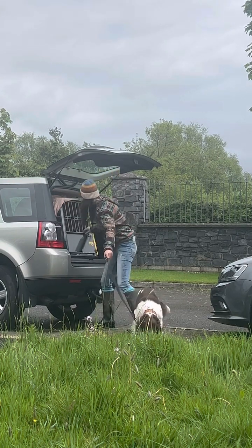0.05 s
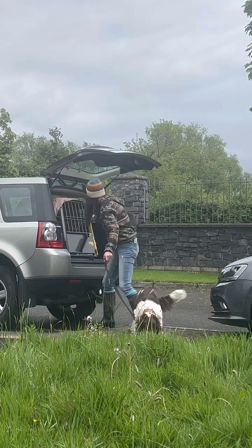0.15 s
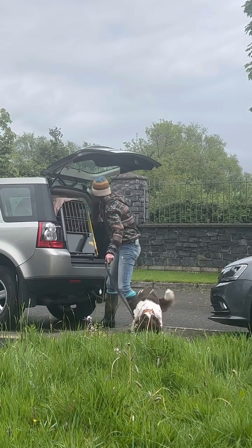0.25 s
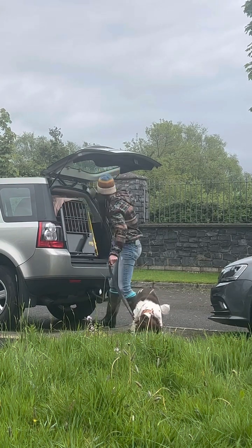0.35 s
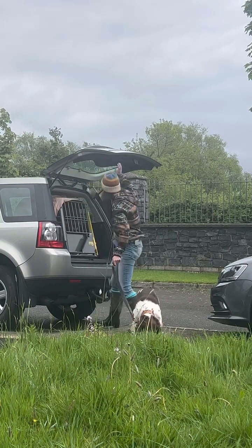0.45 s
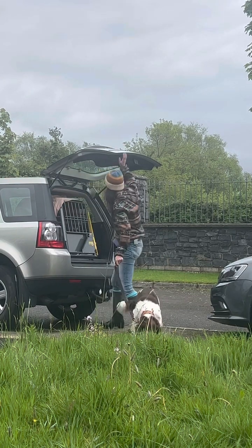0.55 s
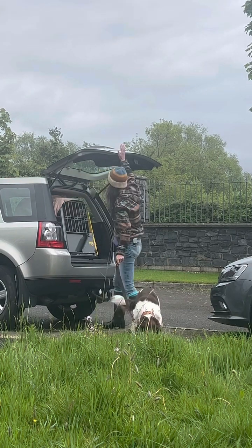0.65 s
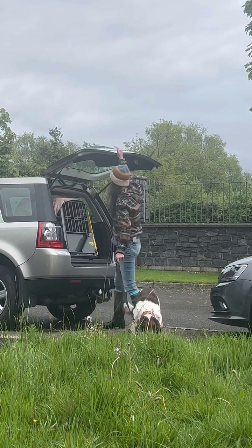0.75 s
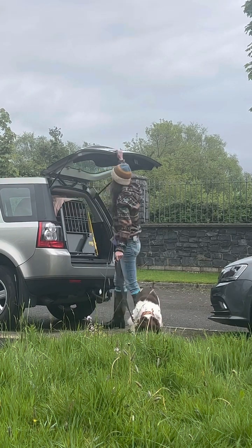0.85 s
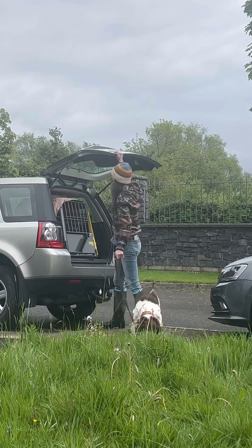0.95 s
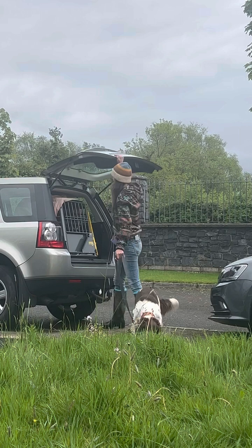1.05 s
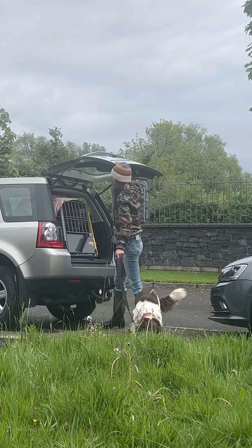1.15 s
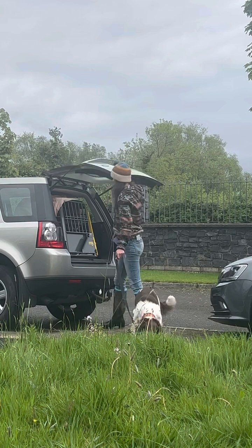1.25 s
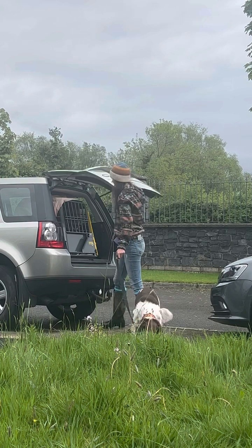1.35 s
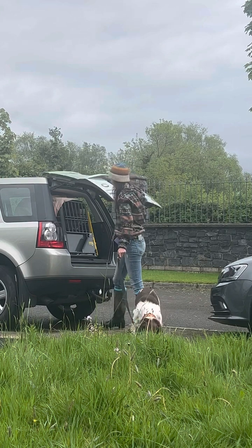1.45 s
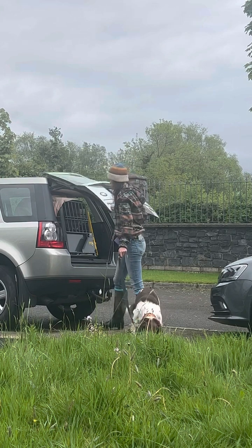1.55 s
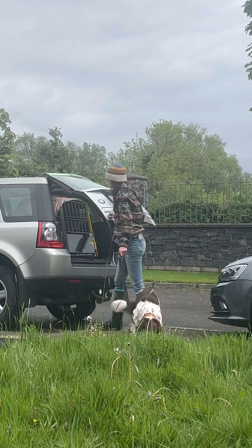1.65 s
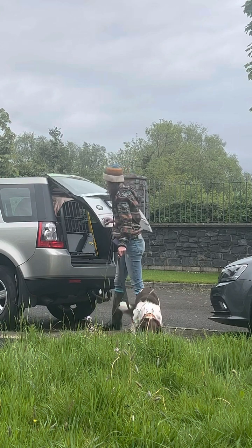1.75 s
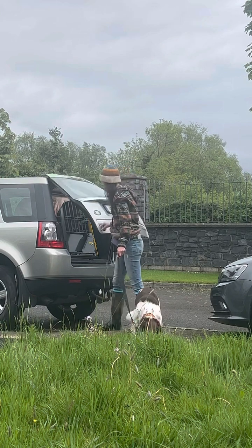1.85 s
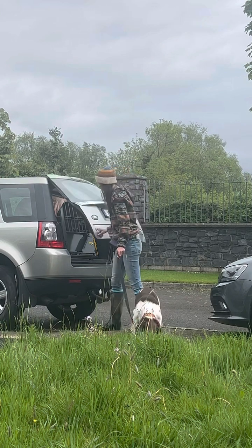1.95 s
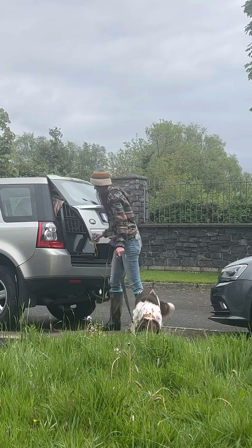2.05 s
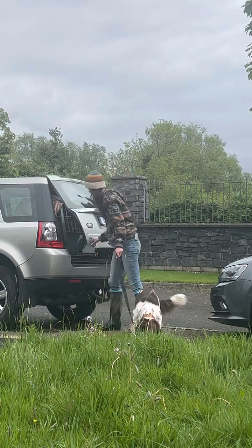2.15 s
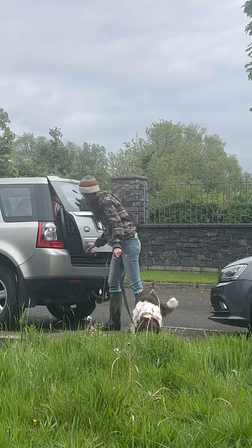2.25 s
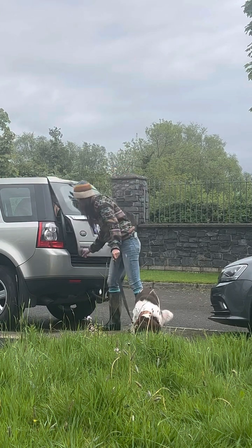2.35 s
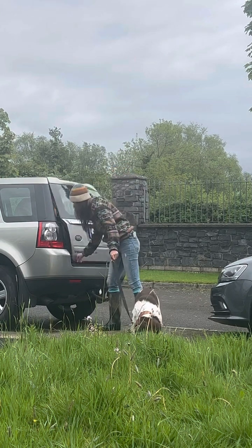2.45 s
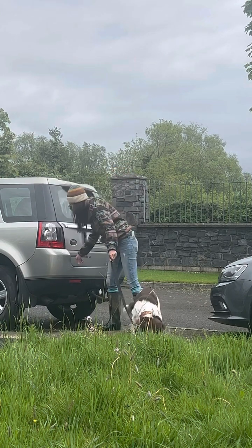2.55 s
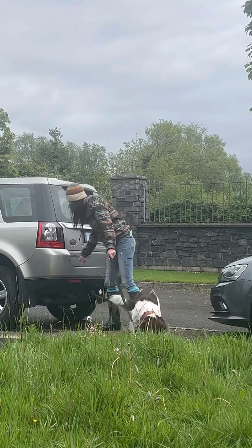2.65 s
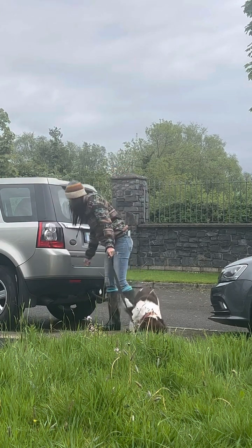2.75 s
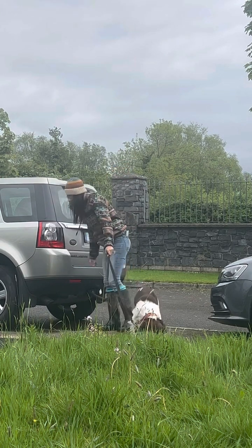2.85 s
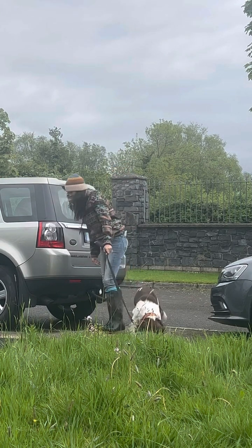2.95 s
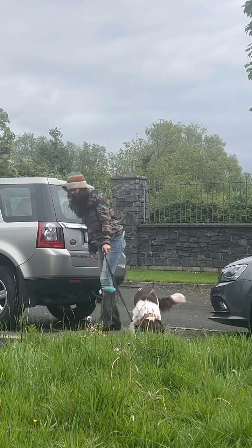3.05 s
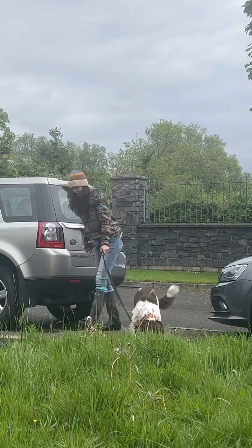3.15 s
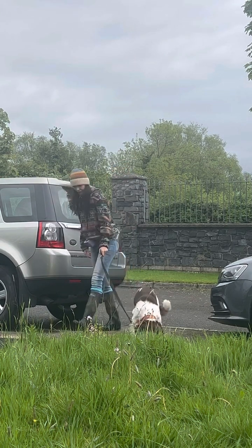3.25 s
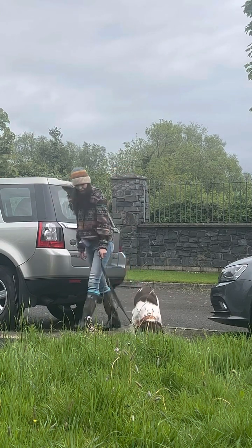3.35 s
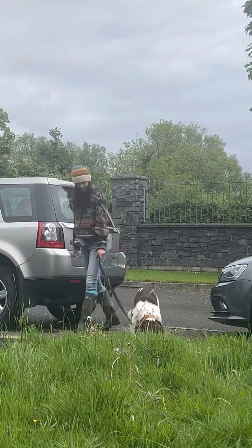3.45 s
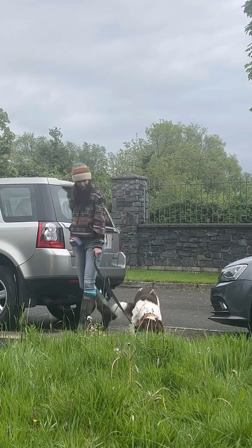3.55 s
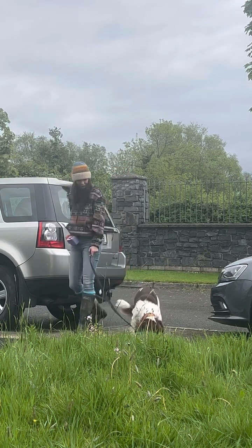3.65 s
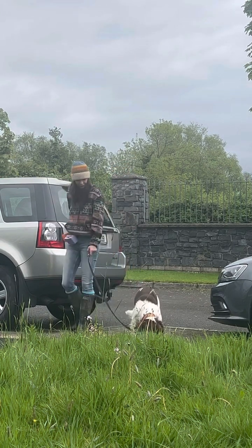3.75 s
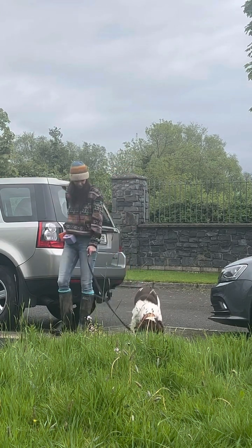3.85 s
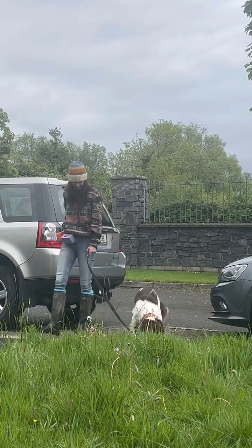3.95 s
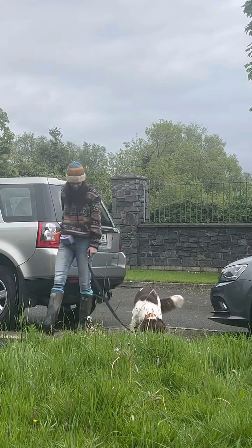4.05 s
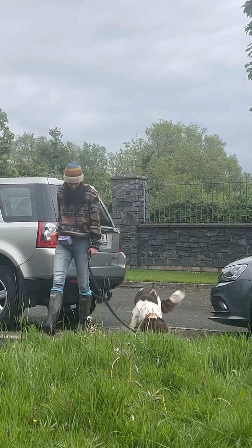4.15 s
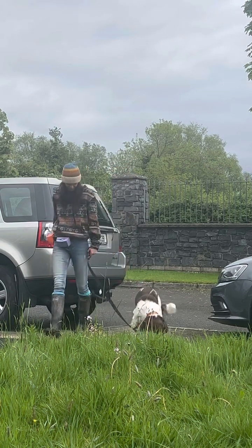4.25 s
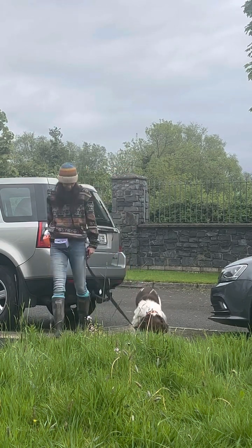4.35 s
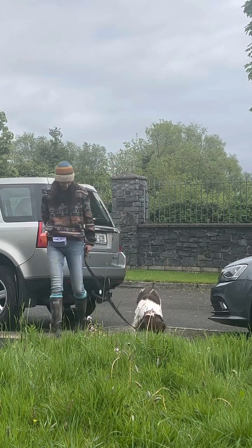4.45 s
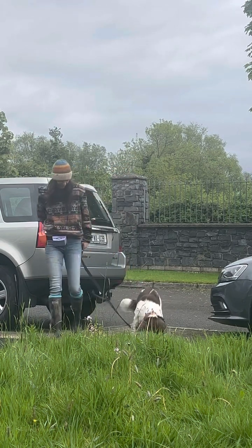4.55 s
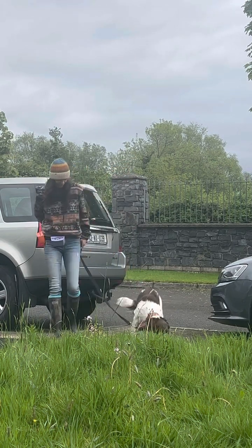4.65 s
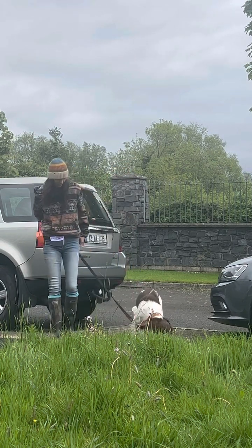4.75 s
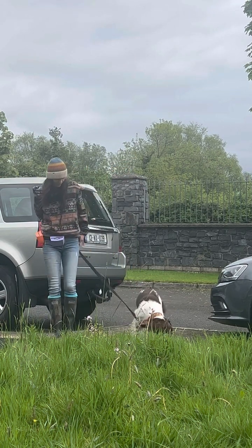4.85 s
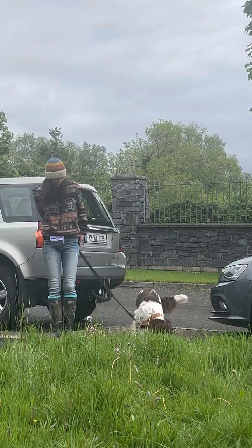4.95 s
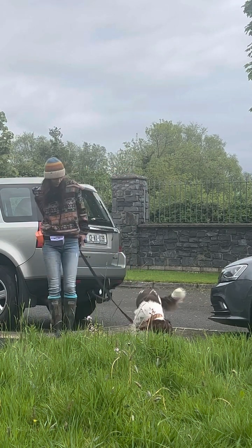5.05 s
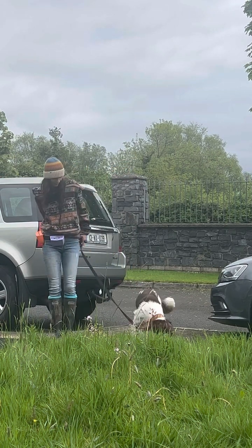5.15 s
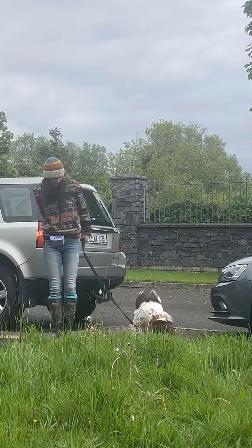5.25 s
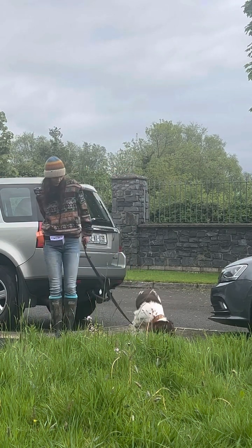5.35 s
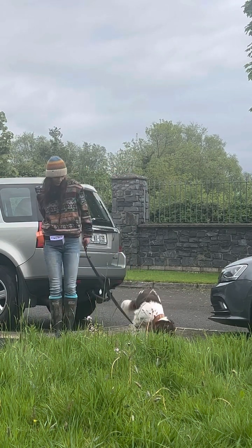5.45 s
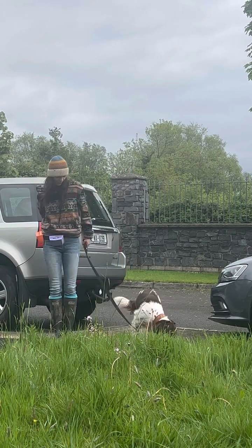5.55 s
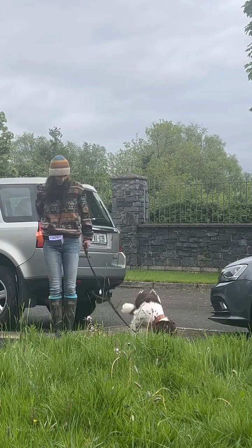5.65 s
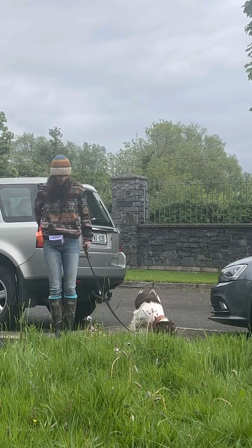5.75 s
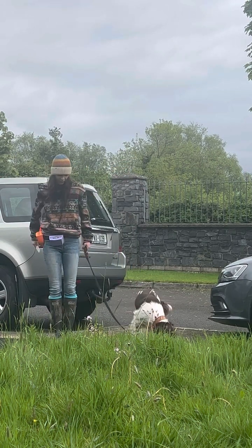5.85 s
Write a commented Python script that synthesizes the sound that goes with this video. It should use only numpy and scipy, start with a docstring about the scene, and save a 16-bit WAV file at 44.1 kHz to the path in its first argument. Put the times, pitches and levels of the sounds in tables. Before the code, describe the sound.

A quiet country roadside is heard from several metres away. Distant traffic hums low throughout, and small birds give faint chirps, thin whistles and buzzy trills in the trees, a little to the right, clearest around 0.5 seconds and from 2.4 to 3.2 seconds. In the first two seconds, rubber boots make a few soft thuds and scuffs, with a barely audible hiss from the tailgate's struts. At 2.5 seconds the car tailgate gives a short falling squeak and immediately slams shut, slightly left. This is by far the loudest sound: a deep boom with a latch clack and a shudder of panels, dying away within about half a second. More soft steps come at 3.5 seconds and around 4.3 to 4.4 seconds. A very faint crow caws once near 4.2 seconds, and a faint hollow tone swells far off. Birds and traffic continue until about 6 seconds.

```python
"""A tailgate shut at a country roadside

Some metres away across a grass verge, a car's tailgate comes down on faintly hissing gas struts.
It squeaks by stick-slip friction, the latch catches, and the impact excites the body's modes,
so that it booms and shudders. Boots shuffle, small birds sing frequency-modulated notes in the
trees, and far off a crow calls once and a hollow tone swells, over the hum of distant traffic."""
import sys
import numpy as np
from scipy import signal
from scipy.fft import rfft, irfft
from scipy.io import wavfile
from scipy.ndimage import uniform_filter1d

SR = 44100
rng = np.random.default_rng(int(sys.argv[2]) if len(sys.argv) > 2 else 0)


def master_out(mix):
    """Clip the mix to full scale and print it as 16-bit PCM to the path in sys.argv[1]."""
    frames = np.transpose(np.atleast_2d(mix))
    ceiling = np.clip(frames, -1, 1)
    pcm = np.round(ceiling * 32767).astype(np.int16)
    wavfile.write(sys.argv[1], SR, pcm)


N = 260190
TIME = np.arange(N) / SR
HZ = np.fft.rfftfreq(N, 1 / SR)


# Blows of the gate on its seal. Each row: start in seconds, push in dB, contact time in seconds.
SEAL_BLOWS = [(2.5417, -37.5, 0.0026), (2.5812, -9.5, 0.0019), (2.592, -32, 0.00047), (2.6165, -23, .0007),
              (2.6485, -22, 0.0023), (2.6685, -17, 0.0019), (2.792, -30.5, 0.0041)]
# Modes of panels and cabin. Each row: frequency in Hz, level in dB, 60 dB decay time (T60) in seconds.
BODY_MODES = [(41, -10.5, 0.45), (62.3, -2, 0.15), (75.15, -4.5, 0.59), (103, -13.5, 0.31),
              (119.8, -11.5, 0.5), (139.2, -11.5, 0.29), (175.3, 1.9, 0.15), (196.5, -2, 0.12),
              (234, -7.5, 0.17), (278, -3.5, 0.064), (329.2, 0, 0.3), (468, -2, 0.12), (509, -3, 0.17),
              (634, -4, .09), (730, -13, 0.17), (785, -33, 0.049), (944, -7.5, 0.11), (1077, -9.5, 0.086),
              (1133, -9.5, .15), (1260, -5, 0.073)]
# Small panels, too many to tell apart. Each row: frequency in Hz, T60 in seconds.
PANEL_DECAY = [(100, .31), (350, 0.42), (1000, 0.13)]
# Shudder of loose trim and load. Each row: frequency in Hz, relative spectral level in dB.
SHUDDER_SPECTRUM = [(30, -30), (60, -10), (125, -5), (320, -1), (410, -6), (600, -8), (900, -0.5),
                    (1500, -18), (4000, -42.5)]

def body_boom(shudder_db=16):
    """Modal response: each blow rings the body's damped modes; dense panel modes merge into a rumble."""
    t = np.arange(SR) / SR
    ring = -sum((-1) ** k * gain_of(db - 60 * t / t60) * np.sin(2 * np.pi * hz * t)
                for k, (hz, db, t60) in enumerate(BODY_MODES))
    force = np.zeros(N)
    for start, push_db, contact in SEAL_BLOWS:
        u = 2 * t / contact  # a longer contact, on the rubber seal, reaches only the low modes
        pulse = u * np.exp(-u)
        add(force, start, gain_of(push_db) * pulse / pulse.sum())
    boom = lowpass(signal.fftconvolve(force, ring)[:N], 3000, order=4)
    panels = echoes(force, PANEL_DECAY, rise_s=0.013)[0]
    shudder = filtered(panels, unit_rms(gain_of(curve_at(SHUDDER_SPECTRUM))))
    return boom + gain_of(shudder_db) * shudder


# Clacks of latch and trim. Each row: start in seconds, level in dB, cutoff in Hz, T60 in seconds.
LATCH_CLACKS = [(2.5745, -32, 3700, 0.09), (2.5835, -30.5, 13000, 0.068), (2.597, -39, 7000, 0.1),
                (2.62, -48, 9000, 0.29), (2.642, -50, 9000, 0.19), (2.665, -46, 8600, 0.076),
                (2.676, -45, 3400, 0.059)]
# Their shared timbre. Each row: frequency in Hz, relative spectral level in dB.
LATCH_SPECTRUM = [(200, -24), (500, 7.5), (900, 3), (1400, -7.5), (2400, -5.5), (3300, -4.5), (4500, -11),
                  (5500, -17), (7200, -13), (11000, -25.5), (12800, -38), (16000, -35.5)]

def latch(rattle_db=-20, rattle_t60=0.11, grain_db=3, rise_s=0.002):
    """Impact noise: each clack is a gritty burst that decays exponentially, with a faint rattle."""
    t = np.arange(SR // 4) / SR
    clacks, hiss = np.zeros((2, N)), noise(0)
    for k, (start, db, cutoff_hz, t60) in enumerate(LATCH_CLACKS):
        attack = 1 - np.exp(-t / rise_s)
        decay = gain_of(-60 * t / t60) + gain_of(rattle_db - 60 * t / rattle_t60)
        grain = unit_rms(gain_of(grain_db * np.tanh(wander(len(t), span=50))))
        burst = gain_of(db) * attack * decay * grain * hiss[:, k * len(t):(k + 1) * len(t)]
        add(clacks, start, lowpass(burst, cutoff_hz, order=2))
    return filtered(clacks, unit_rms(gain_of(curve_at(LATCH_SPECTRUM))))


# The two slips of the closing gate. Each row: start in seconds, length in seconds, level in dB.
SQUEAK_SLIPS = [(2.482, 0.026, -39), (2.502, 0.0732, -35.5)]

def squeak(start_hz=594, sag=0.09, brake=0.085, jitter=0.0032):
    """Stick-slip friction: a falling tone whose second harmonic grows as the upper ones fade."""
    start, end = SQUEAK_SLIPS[0][0], SQUEAK_SLIPS[-1][0] + SQUEAK_SLIPS[-1][1]
    u = np.linspace(0, 1, int((end - start) * SR))
    hz = start_hz * (1 - sag * u - brake * u ** 6)  # sags, then drops as the seal brakes the gate
    phase = phase_of(hz * (1 + jitter * wander(len(u), span=150)))
    flicker_db = 4.8 * wander((4, len(u)), span=600)  # uneven slips: upper harmonics come and go
    upper = sum(gain_of(flicker_db[i] - 1.2 * i) * np.sin(k * phase) for i, k in enumerate(range(3, 7)))
    second = gain_of(-24.5 + 25.5 * u) * np.sin(2 * phase)
    tone, swell = np.zeros((2, N))
    add(tone, start, np.sin(phase) + second + gain_of(-23 - 7.5 * u) * upper)
    for onset, length, db in SQUEAK_SLIPS:
        skewed = np.linspace(0, 1, int(length * SR)) ** 1.36  # swells more slowly than it dies
        add(swell, onset, gain_of(db) * abs(np.sin(np.pi * skewed)) ** 0.63)
    return np.sqrt(2) * swell * tone


# Direction of the car. Each row: frequency in Hz, left minus right level in dB.
CAR_BALANCE = [(120, 0), (350, 2), (550, 5.5), (1200, 6.5), (3500, 0)]
# Reverberation of the street. Each row: frequency in Hz, T60 in seconds.
STREET_DECAY = [(60, 0.36), (250, 0.87), (1000, 0.47), (4000, 0.13), (12000, 0.42)]

def tailgate(street_db=-20, wall_db=-23, wall_delay_s=0.072):
    """Reflection: the slam comes from the left; a stone wall behind the car and the street return it."""
    direct = body_boom() + latch() + squeak()
    sides = gain_of(np.array([[.5], [-.5]]) * curve_at(CAR_BALANCE))
    wall = gain_of(wall_db) * np.exp(-2j * np.pi * HZ * wall_delay_s)
    street = gain_of(street_db) * echoes(direct[0], STREET_DECAY, rise_s=0.023)
    return filtered(direct, sides + wall) + street


# Pulls on the gas struts. Each row: start in seconds, length in seconds, level in dB.
STRUT_PULLS = [(0.953, 0.28, -91), (1.148, 0.34, -85), (1.38, 0.31, -86.5), (1.7, 0.98, -94)]
# Hiss of the gas. Each row: frequency in Hz, relative spectral level in dB.
STRUT_SPECTRUM = [(2000, -30), (6000, -5), (9600, -3), (12000, -4), (13500, -19), (16000, -32)]

def struts():
    """Flow noise: gas hisses softly through the struts while the gate comes down."""
    return swells(STRUT_PULLS) * noise(curve_at(STRUT_SPECTRUM))


# Steps on the road. Each row: start in seconds, level in dB, nominal pitch in Hz.
BOOT_STEPS = [(0.063, -43.5, 158), (0.519, -45.5, 207), (.886, -48, 190), (1.685, -44, 229),
              (3.483, -40, 187), (4.298, -49.5, 240), (4.311, -39, 105), (4.401, -40.5, 187)]
# Scuffs of boots and coat. Each row: start in seconds, length in seconds, level in dB.
SCUFF_STROKES = [(0.446, 0.21, -57), (1.569, 0.23, -53), (1.75, 0.15, -62), (4.196, 0.35, -60)]
# Timbre of the scuffs. Each row: frequency in Hz, relative spectral level in dB.
SCUFF_SPECTRUM = [(90, -19.5), (200, 4), (330, -13), (600, -9.5), (1200, -28), (8000, -54)]

def boots(thud_s=0.007, sag=0.68):
    """Damped impact and friction: rubber soles thud, sinking in pitch as they settle, and scuff."""
    u = np.arange(SR // 8) / SR / thud_s
    thuds = np.zeros(N)
    for start, db, hz in BOOT_STEPS:
        pitch = hz * (1 + sag * (np.exp(-u) - .3))
        add(thuds, start, gain_of(db) * u * np.exp(1 - u) * np.sin(phase_of(pitch)))
    street = gain_of(-14) * echoes(thuds, STREET_DECAY, rise_s=0.0096)
    return thuds + street + swells(SCUFF_STROKES) * noise(curve_at(SCUFF_SPECTRUM))


FLICKS_PER_S = 77

def trill(length, hz, fall_oct=.25, swing_hz=850, narrowing=0.382, swell_db=6):
    """Frequency and amplitude modulation: pitch and loudness of a falling buzz of uneven flicks."""
    fall = glide(length, hz, -fall_oct)
    u = np.linspace(0, 1, len(fall))
    hurry, height = wander((2, len(u)), span=500)
    flick = 1 - abs(np.cos(phase_of(FLICKS_PER_S * (1 + .07 * hurry)) / 2))
    swing = swing_hz * (1 - narrowing * u) * (2 * flick * (1 + 0.1407 * height) - .6)
    dip = 0.52 + 0.1 * u  # the voice weakens at the top of a flick, more so late in the call
    return fall + swing, (1 - dip * flick) * gain_of(swell_db * u)


# Gliding chirps. Each row: start and length in seconds, pitch in Hz, glide in octaves, level in dB.
BIRD_CHIRPS = [(0.022, 0.055, 2830, -0.32, -71), (0.16, 0.04, 4780, -0.13, -75),
               (0.32, 0.033, 3420, -0.49, -70), (.39, 0.015, 3650, 0.44, -71.5),
               (0.434, 0.038, 3790, 0.13, -70.5), (.735, 0.027, 2130, 0.094, -70),
               (0.831, 0.073, 3550, -.02, -67.5), (2.017, 0.03, 3950, .2, -69.5),
               (2.137, 0.038, 3640, 0.0095, -68.5), (2.172, 0.022, 4100, 0.23, -66),
               (2.311, 0.033, 3650, 0.35, -67.5), (2.797, 0.02, 2930, -0.19, -65),
               (2.964, 0.015, 3880, 0.28, -58.5), (2.971, 0.017, 2960, -0.061, -64),
               (3.034, .05, 3088, -0.062, -60.5), (3.073, .02, 4190, 0.68, -61),
               (3.163, 0.016, 3650, 0.26, -63), (3.172, 0.018, 2960, -0.26, -63.5),
               (3.443, 0.038, 4380, -0.37, -72.5), (4.047, 0.32, 7900, -0.3, -84),
               (4.299, 0.035, 3105, -0.042, -68.5), (4.419, 0.038, 3765, -.33, -64),
               (4.482, 0.024, 3600, 0.83, -67.5), (4.668, 0.045, 3690, -0.22, -68.5),
               (4.918, 0.019, 3450, -0.098, -68.5)]
# Thin whistles, clear or husky. Each row: start and length in seconds, pitch in Hz,
# glide in octaves, waver as a share of the pitch, level in dB.
BIRD_WHISTLES = [(.455, 0.062, 2480, -.12, .02, -72), (.62, 0.071, 2490, 0, .012, -71),
                 (0.75, 0.071, 6090, -0.06, 0.016, -81), (0.78, .06, 2704, -0.13, 0.016, -72),
                 (0.942, .11, 6090, 0.058, 0.022, -78.5), (1.177, 0.086, 6080, 0, 0.017, -79.5),
                 (1.891, 0.17, 7070, -0.068, 0.026, -79), (2.097, 0.1, 5040, -0.052, 0.016, -72.5),
                 (2.708, 0.13, 6020, 0, 0.0065, -72), (3.555, 0.15, 5930, .09, 0.014, -73.5),
                 (4.452, 0.065, 2855, -0.092, 0.012, -68), (4.701, .08, 3700, -0.96, .07, -70),
                 (4.749, .1, 2965, -.32, 0.063, -70.5), (5.205, .11, 2030, 0.13, 0.037, -72.5),
                 (5.421, 0.083, 2650, .1, 0.037, -71.5), (5.565, 0.071, 2108, -0.052, 0.028, -71),
                 (5.738, 0.097, 2430, -0.071, 0.018, -72.5)]
# Buzzing calls. Each row: start and length in seconds, pitch in Hz, level in dB.
BIRD_TRILLS = [(0.477, 0.17, 4270, -57.5), (0.998, 0.14, 4176, -65.5), (1.485, 0.082, 5270, -73.5),
               (1.799, 0.099, 4180, -73.5), (2.432, 0.16, 4360, -58), (2.748, .2, 4370, -66.5),
               (2.966, 0.092, 7580, -79.5), (3.681, 0.44, 6200, -80), (3.948, 0.11, 4350, -66.5),
               (4.668, .13, 4360, -71.5)]

def bird_notes(near_db=-63, waver=.011, undertone_ratio=.76, undertone_db=-19):
    """Direct-to-reverberant ratio: lists the notes; the fainter one is, the larger its share of echo."""
    for start, length, hz, octaves, db in BIRD_CHIRPS:
        yield start, glide(length, hz, octaves, ease=.7), 1, waver, db, (near_db - db) / 26
    for start, length, hz, octaves, huskiness, db in BIRD_WHISTLES:
        yield start, glide(length, hz, octaves), 1, huskiness, db, (near_db - db) / 15
    for start, length, hz, db in BIRD_TRILLS:
        pitch, loudness = trill(length, hz)
        scattered = 0.15 + max(near_db - db, 0) / 7
        yield start, pitch, loudness, waver, db, scattered
        # the other half of the voice box sings lower and softer
        yield start, undertone_ratio * pitch, loudness, waver, db + undertone_db, scattered


def birds(octave_db=-29, flutter_db=2.5, most_scattered=0.85):
    """Scattering: leaves blur the near-sine notes, and far ones come mostly as echo from the trees."""
    near, far = np.zeros((2, N)), np.zeros(N)
    for start, hz, loudness, waver, db, scattered in bird_notes():
        drift, flutter = wander((2, len(hz)), span=200)
        phase = phase_of(hz * (1 + waver * drift))
        envelope = loudness * signal.windows.tukey(len(hz), 1 / 3) * gain_of(flutter_db * flutter)
        voice = np.sin(phase) + gain_of(octave_db) * np.sin(2 * phase)
        note = gain_of(db) * unit_rms(envelope * voice)
        scattered = np.clip(scattered, 0, most_scattered)
        add(near, start, np.sqrt(1 - scattered) * note * gain_of([[-1], [1]]))  # a little to the right
        add(far, start, np.sqrt(scattered) * note)
    leaves = gain_of(-6) * echoes(near[1], [(4000, .2)], rise_s=.002)
    trees = echoes(far, [(2000, 1.0), (8000, 0.42)], rise_s=0.0017)
    return near + leaves + trees


def twitter(count, pitch_hz, spread_oct, glide_oct, note_s, waver):
    """Superposition: short, wavering random glides around one pitch merge into a texture."""
    song = np.zeros(N)
    for k, (when, length, pitch, bend, size) in enumerate(rng.random((count, 5))):
        centre_hz = pitch_hz * 2 ** (spread_oct * (2 * pitch - 1))
        hz = glide(note_s * (.5 + length), centre_hz, glide_oct * (2 * bend - 1))
        vibrato = waver * np.sin(2 * np.pi * FLICKS_PER_S * (.5 + size) * TIME[:len(hz)])
        note = (.5 + size) * np.hanning(len(hz)) * np.sin(phase_of(hz * (1 + vibrato)))
        add(song, (k + when) / count * N / SR, note)
    return unit_rms(song)


# Waves of distant song. Each row: time in seconds, small birds' level in dB, warblers' level in dB.
CHORUS_LEVELS = [(0.0, -89, -73.5), (0.76, -80, -71.5), (1.02, -69.5, -81), (1.39, -76.5, -105),
                 (1.95, -74.5, -81), (2.6, -68, -69.5), (3.15, -66, -70.5), (3.79, -76.5, -75),
                 (4.6, -80, -75), (5.4, -91, -76), (5.9, -100, -94)]

def chorus(trees_t60=0.32):
    """Diffuse field: deep in the trees small birds twitter and larger ones warble, heard only as echo."""
    times, small_db, warble_db = np.transpose(CHORUS_LEVELS)
    small = twitter(420, pitch_hz=3615, spread_oct=0.22, glide_oct=0.305, note_s=.035, waver=0.045)
    warble = twitter(280, pitch_hz=2810, spread_oct=0.35, glide_oct=0.304, note_s=0.0354, waver=0.032)
    song = fader(times, small_db) * small + fader(times, warble_db) * warble
    return echoes(song, [(4000, trees_t60)], rise_s=0.0032)


def crow(start=4.16, length=0.2, pitch_hz=245, throat_hz=1380, width_hz=260, rough=0.0654, db=-64):
    """Source and filter: a throat resonance shapes the harmonics of one hoarse caw, heard as echo."""
    count = int(length * SR)
    phase = phase_of(pitch_hz * (1 + rough * wander(count, span=100)))
    voice = sum(np.sin(k * phase) / (1 + ((k * pitch_hz - throat_hz) / width_hz) ** 2)
                for k in range(4, 10))
    caw = np.zeros(N)
    add(caw, start, gain_of(db) * unit_rms(voice) * signal.windows.tukey(count, .5))
    return echoes(caw, [(1000, 1.0), (3000, 0.19)], rise_s=0.0024)


def far_drone(start=4.27, length=0.6, pitch_hz=164, width_hz=11, db=-68):
    """Narrow-band noise at two odd harmonics: a rough, hollow tone swells and fades far down the road."""
    swell = np.zeros(N)
    add(swell, start, signal.windows.tukey(int(length * SR), .5))
    off_hz = np.minimum(abs(HZ - 3 * pitch_hz), abs(HZ - 5 * pitch_hz))
    return gain_of(db) * swell * noise(-20 * np.log10(1 + (off_hz / width_hz) ** 2))


# Far traffic and air. Each row: frequency in Hz, relative spectral level in dB.
AIR_SPECTRUM = [(15, -14), (28, -37), (45, -1.5), (66, 3.5), (100, -3.5), (190, -10), (330, -21),
                (620, -25), (890, -21.5), (1600, -29), (3000, -37.5), (5500, -45.5), (9500, -54),
                (14000, -63.5)]
# Bands of tyre noise. Each row: centre in Hz, width in Hz, boost in dB.
TYRE_BANDS = [(836, 15, 1.5), (891.6, 46, 8), (1053.6, 31, 8.5), (1183, 92, -4.5), (1251, 44, 6.5),
              (1460, 28, 8)]
# Ebb and flow of traffic. Each row: time in seconds, rumble gain in dB, tyre roar gain in dB.
TRAFFIC_GAINS = [(0, -53, -51), (.8, -51, -47.5), (1.3, -51.5, -51), (2.2, -52, -54), (3.6, -53, -51.5),
                 (4.6, -53, -54.5), (5.3, -55, -50), (5.9, -53.5, -52)]

def far_traffic(hum_hz=66, hum_db=4, air_db=-52, hiss_db=-50, recede_db_per_s=1.26):
    """Broadband noise: rumble and tyre roar come and go in still air; the tyre hiss slowly recedes."""
    tyres_db = sum(db * bell(hz, width / 2) for hz, width, db in TYRE_BANDS)
    air = noise(curve_at(AIR_SPECTRUM) + tyres_db + hum_db * bell(hum_hz, 6))
    rumble = filtered(air, 1 / (1 + (HZ / 450) ** 4))
    roar = filtered(air, bell(900, 200))
    hiss = filtered(air, bell(1480, 350))
    times, rumble_db, roar_db = np.transpose(TRAFFIC_GAINS)
    traffic = fader(times, rumble_db) * rumble + fader(times, roar_db) * roar
    traffic += gain_of(hiss_db - recede_db_per_s * TIME) * hiss
    return traffic + gain_of(air_db) * (air - rumble - roar - hiss)


# Likeness of the two channels. Each row: frequency in Hz, correlation from 0 to 1.
STEREO_COHERENCE = [(70, 1), (130, .99), (280, .93), (600, .55), (1300, .45), (2800, .15)]

def noise(spectrum_db):
    """Spatial coherence: stereo noise of unit RMS, alike in both ears only in the bass."""
    common, opposed = rfft(rng.standard_normal((2, N)))
    angle = np.arccos(np.clip(curve_at(STEREO_COHERENCE), -1, 1)) / 2
    pair = np.cos(angle) * common + np.array([[1], [-1]]) * np.sin(angle) * opposed
    return unit_rms(irfft(pair * gain_of(spectrum_db), N))


def echoes(x, t60s, rise_s):
    """Reverberation: scattered reflections build up, then die as the (Hz, T60 in seconds) rows say."""
    hz, t, bands = signal.stft(noise(0)[:, :SR], SR, nperseg=256)
    decay = gain_of(-60 * t / curve_at(t60s, hz)[:, None])
    tail = signal.istft(bands * decay * (1 - np.exp(-t / rise_s)), SR, nperseg=256)[1]
    return signal.fftconvolve(x[None], tail / np.linalg.norm(tail[0]), axes=1)[:, :N]


def glide(length, hz, octaves, ease=1):
    """Pitch sliding by so many octaves around hz; with ease below 1 it starts fast and levels off."""
    return hz * 2 ** (octaves * (np.linspace(0, 1, int(length * SR)) ** ease - .5))


def swells(strokes):
    """An envelope with one smooth hump for each stroke."""
    envelope = np.zeros(N)
    for start, length, db in strokes:
        add(envelope, start, gain_of(db) * np.hanning(int(length * SR)))
    return envelope


def wander(shape, span):
    """Random drift of unit RMS, smoothed over span samples."""
    return unit_rms(uniform_filter1d(rng.standard_normal(shape), size=span))


def curve_at(points, hz=HZ):
    """Interpolation of (Hz, value) points on a log-frequency axis."""
    knots, values = np.transpose(points)
    return np.interp(np.log(hz + 1), np.log(knots + 1), values)


def bell(centre_hz, half_width_hz):
    return np.exp(-((HZ - centre_hz) / half_width_hz) ** 2)


def filtered(x, response):
    return irfft(rfft(x) * response, N)


def lowpass(x, hz, order):
    return signal.sosfilt(signal.butter(order, hz, fs=SR, output="sos"), x)


def phase_of(hz):
    return 2 * np.pi * np.cumsum(hz) / SR


def gain_of(db):
    return 10 ** (np.asarray(db) / 20)


def fader(times, db):
    return gain_of(np.interp(TIME, times, db))


def unit_rms(x):
    return x / np.sqrt(np.mean(x ** 2) + 1e-20)


def add(mix, start, sound):
    part = mix[..., max(round(start * SR), 0):][..., :sound.shape[-1]]
    part += sound[..., :part.shape[-1]]


def scene():
    """Linear superposition: the pressures of all sources add."""
    return tailgate() + struts() + boots() + birds() + chorus() + crow() + far_drone() + far_traffic()


def record(dry, low_hz=30, high_hz=15800, fade_in_s=.008, left_delay_s=.000025):
    """Band limiting: the microphones lose deep bass and top treble; sound reaches the left one later."""
    thin = signal.sosfilt(signal.butter(3, low_hz, "high", fs=SR, output="sos"), dry)
    thin *= np.minimum(TIME / fade_in_s, 1)
    spaced = filtered(thin, np.exp(-2j * np.pi * HZ * [[left_delay_s], [0]]))
    treble_cut = signal.firwin(511, high_hz, window=("kaiser", 9), fs=SR)
    return signal.oaconvolve(spaced, treble_cut[None], "same")


dry = scene()
out = record(dry)
master_out(out)
```